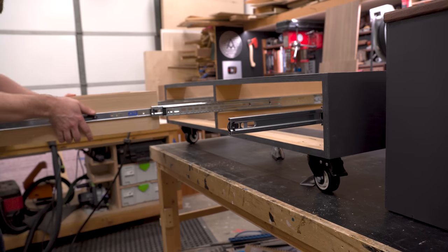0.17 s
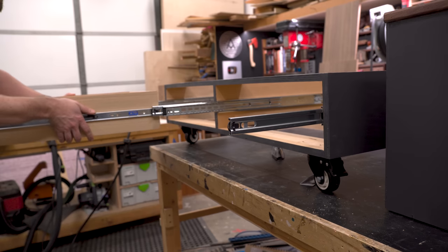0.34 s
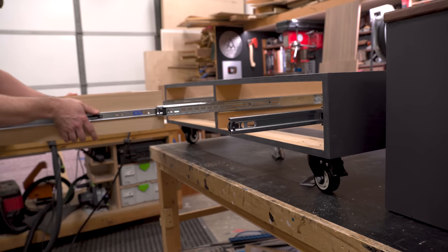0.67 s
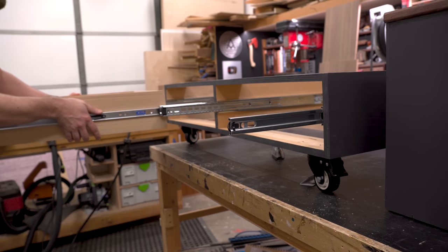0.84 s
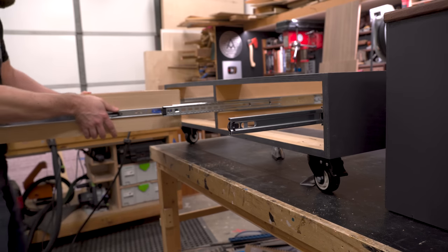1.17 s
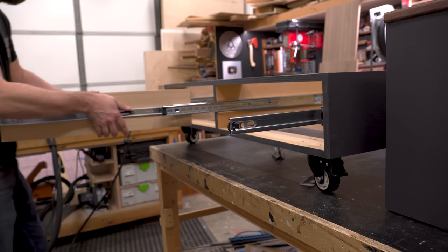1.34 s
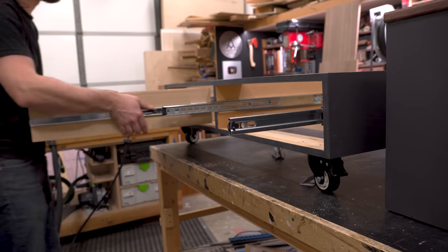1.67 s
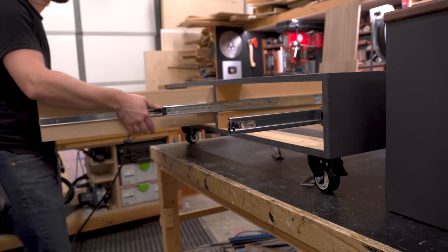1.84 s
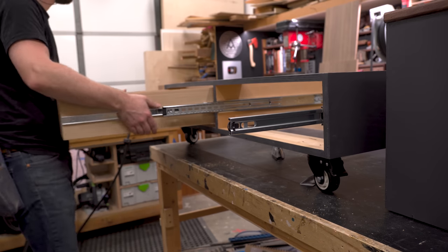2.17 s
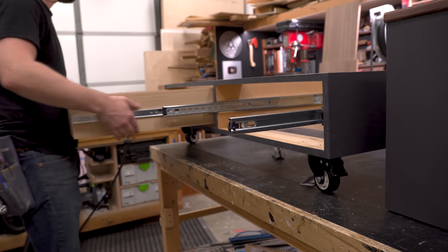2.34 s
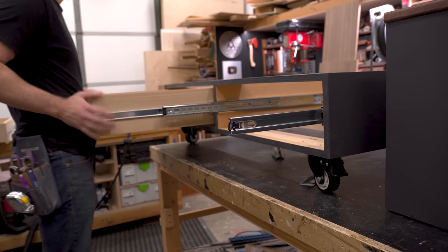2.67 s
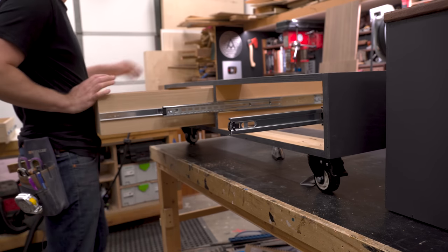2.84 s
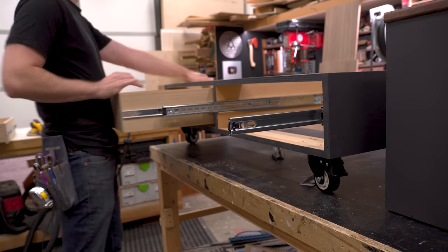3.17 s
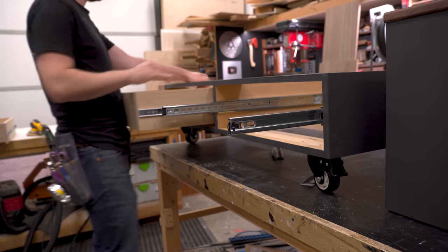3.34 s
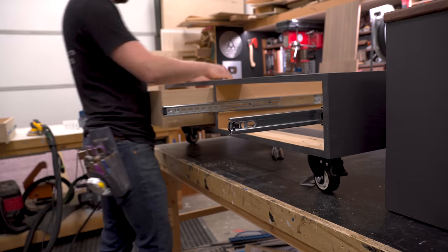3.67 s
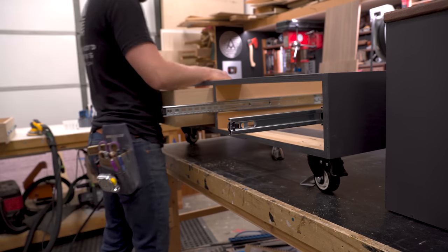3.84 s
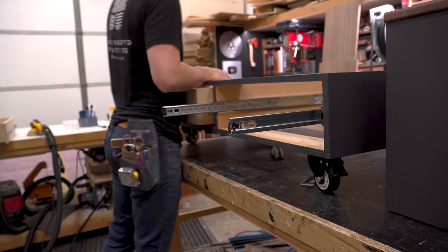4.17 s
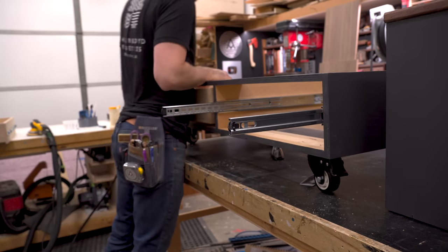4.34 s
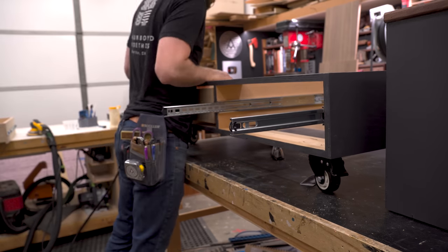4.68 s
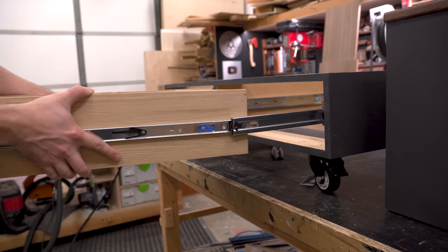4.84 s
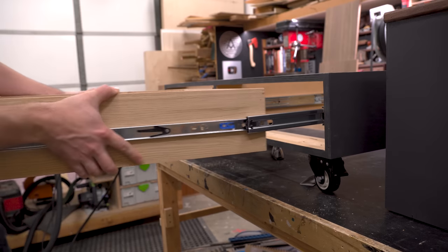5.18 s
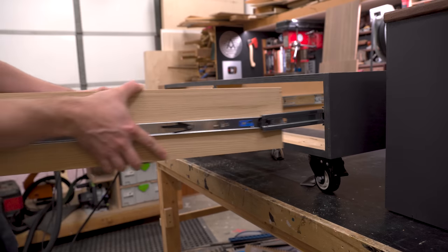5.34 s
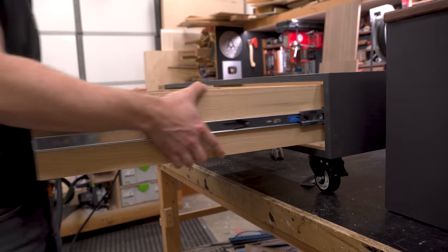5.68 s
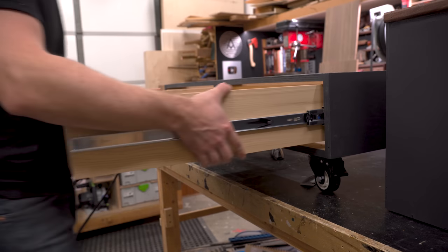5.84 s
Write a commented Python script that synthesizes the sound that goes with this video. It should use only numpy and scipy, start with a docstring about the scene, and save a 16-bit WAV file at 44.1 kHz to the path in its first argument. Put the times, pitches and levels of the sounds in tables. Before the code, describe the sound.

A wooden drawer is eased onto metal ball-bearing slides with light knocks, ticks and scrapes. A sharp steel clack comes midway, then the drawer rolls in with a low rumble, a brief rising hum and louder wooden bumps, ending in a ringing metal clack. After a short lull it rolls and knocks again. The sounds are clear, with a short workshop echo.

```python
"""A wooden drawer rolls on steel ball-bearing slides as it is fitted and pushed home in a workshop.
Rough tracks force the box into a rumble while the balls hiss, the rails rub and, on the long push,
a hum climbs. Impacts excite free vibration: the box knocks, the ball cage ticks, and twice a rail
strikes its stop and rings. The hard walls return the impacts and scuffs as diffuse reverberation,
over the faint steady noise of the air."""
import sys
import numpy as np
from scipy import signal
from scipy.fft import rfft, irfft
from scipy.io import wavfile

SR = 44100
rng = np.random.default_rng(int(sys.argv[2]) if len(sys.argv) > 2 else 0)


def dump_mix(stems):
    """Bounce the given channels to the path in sys.argv[1] as a 16-bit WAV at rate SR."""
    frames = np.atleast_2d(stems).T  # one column per channel
    limited = np.clip(frames, -1, 1)  # hard clip at full scale
    pcm = np.round(limited * 32767).astype(np.int16)
    wavfile.write(sys.argv[1], SR, pcm)


N = 265041

# Levels in the tables are relative.
# stretches of rolling, with abrupt level changes between them: t/s, rumble level/dB, hiss level/dB
ROLL_CURVES = [
    [(0.0, -39.5, -53.5), (0.156, -59.5, -66), (0.366, -55, -63), (0.494, -61.5, -74.5), (0.742, -102, -94)],
    [(1.008, -59, -91), (1.2, -53, -71)],
    [(1.21, -45, -60), (1.396, -46.5, -70), (1.646, -48, -73), (1.8, -52.5, -75)],
    [(1.81, -42.5, -64), (1.9, -45.5, -62.5), (2.04, -39, -59.5), (2.166, -47, -59.5),
     (2.314, -48.5, -53.5), (2.728, -48.5, -63.5), (2.87, -50, -70.5), (2.9, -65.5, -60.5)],
    [(3.03, -41, -65.5), (3.134, -43, -73), (3.232, -39, -63), (3.448, -38.5, -64.5), (3.6, -39, -70.5)],
    [(3.61, -36.5, -54.5), (3.662, -42.5, -50), (3.788, -47.5, -54.5), (4.0, -47, -61), (4.19, -45, -58.5),
     (4.44, -41, -57), (4.53, -47.5, -61), (4.81, -65.5, -80)],
    [(4.82, -49.5, -68), (4.932, -59, -78.5), (5.19, -58.5, -67), (5.42, -41.5, -64), (5.59, -41.5, -63.5),
     (5.714, -38, -70), (5.852, -40, -59), (6.01, -42.5, -50.5)],
]
# how tightly the rails bind, one value for each stretch: level added to the rub/dB
BINDING_DB = [-5.5, 3, 0, -2.5, 3.5, 5.5, 2]
# normal modes of the wooden box and of the steel rail: f/Hz, level/dB, T60/s
BOX_MODES = [(77, -28, 0.054), (144, -27, 0.014), (185.7, 2, 0.29), (258.3, 9, 0.1), (320, 1.5, 0.087),
             (388.6, 8, 0.068), (452.2, 9.5, 0.067), (495, 10.5, 0.083), (580, 8.5, 0.038),
             (713, 2.5, 0.073), (800.4, 4.5, 0.056), (960, -11, 0.11), (1214, -3.5, 0.032),
             (1500, -10, 0.018), (1665, -1.5, 0.013)]
RAIL_MODES = [(1083, 1, 0.023), (1957, 1.5, 0.039), (2450, -8, 0.02), (3620, -11, 0.032), (4660, 0, 0.027),
              (5950, -2, 0.012), (6320, -4, 0.04), (5900, -15, 0.049), (6720, 6.5, 0.0071),
              (6700, -3, 0.029), (8300, -6, 0.0071), (8900, -6.5, 0.022), (8800, -10, 0.015),
              (12400, -8, 0.0059), (12600, -7, 0.011), (14700, -28, .006)]
# blows on the box: t/s, level/dB, f favoured by the spot struck/Hz, crack over body/dB
BOX_BLOWS = [(0.009, -32.5, 247, -14), (0.123, -35, 255, -21), (0.1253, -31, 1410, -10),
             (0.191, -39, 470, -7), (0.242, -45, 466, -4), (0.279, -46, 580, -2.5), (0.336, -36, 470, -20),
             (0.472, -43.5, 447, -25), (0.692, -45, 584, -17), (1.222, -35.5, 830, -8),
             (1.255, -28, 1800, -27), (1.26, -31.5, 530, -8), (1.463, -30, 1020, -9.5),
             (1.648, -35.5, 765, -21), (1.704, -35.5, 560, -24), (1.812, -27.5, 540, -14.5),
             (1.83, -24, 396, -35), (1.855, -24, 413, -18.5), (1.936, -36, 530, -4), (1.982, -53, 530, -18),
             (2.034, -17.5, 387, -14.5), (2.161, -30.5, 453, -38), (2.318, -28, 480, -14.5),
             (3.403, -16.5, 580, -24), (3.487, -35, 534, -22), (3.6803, -14, 1500, -10),
             (3.684, -18.5, 530, -19), (3.686, -24.5, 200, -40), (3.7, -18.5, 254, -36),
             (3.878, -22.5, 440, -19), (4.328, -18, 537, -11), (4.34, -17.5, 480, -10),
             (4.351, -19.5, 416, -2), (4.36, -22.5, 266, -38), (4.487, -19, 328, -5),
             (4.488, -24, 184, -37), (4.502, -21, 760, -35), (4.513, -24.5, 510, -27),
             (4.851, -36, 930, -11), (4.953, -46, 327, 2.5), (5.472, -26, 440, -15),
             (5.517, -20.5, 1100, -10.5), (5.526, -14.5, 480, -46), (5.539, -20.5, 500, -47),
             (5.55, -27, 470, -19), (5.695, -29.5, 800, -14), (5.707, -23, 1230, -12),
             (5.72, -26.5, 327, -41), (5.775, -38.5, 304, 0), (5.838, -25.5, 480, -27),
             (5.875, -26, 510, -9)]
# rail against its stop: t/s, crash level/dB, clack f/Hz, clack level/dB, ring level/dB
STOP_IMPACTS = [(3.071, -19.5, 4300, -13, -59), (3.081, -33, 11600, -21, -41.5),
                (4.535, -24, 6470, -12, -27.5)]
# contacts of the ball cage: t/s, level/dB, offset for the lower rail sound/dB
CAGE_CONTACTS = [(0.0438, -51, 9), (0.0595, -49, -14), (1.2233, -46.5, 13.5), (1.263, -44, -5),
                 (1.288, -43.5, 9), (1.3233, -40, 6), (1.3463, -46.5, 8), (1.4866, -41, -31),
                 (1.809, -50, 5), (1.8392, -46, 4), (1.8566, -44, -17), (1.8848, -43, -10),
                 (1.91, -49, 13.5), (1.9394, -49.5, 14), (2.003, -49, 11), (2.02, -40.5, 3),
                 (2.197, -46, -14), (2.3131, -48, -3), (2.36, -47, 6), (3.3164, -52, -3), (3.713, -35, -9),
                 (3.7628, -55, -5), (3.778, -51, -8), (3.815, -40, -33.5), (3.8454, -43, 7),
                 (3.916, -45.5, 12), (3.9484, -50, -10), (3.978, -55, -3), (4.4099, -50, -10),
                 (4.4385, -37.5, -17), (4.467, -46, -3), (4.5177, -26, -6), (4.891, -54.5, 9),
                 (5.5159, -43, 7), (5.5513, -37, -13), (5.5977, -32.5, 2), (5.841, -44, -13),
                 (5.873, -45, -1)]
# resonances of a cage tick: f/Hz, nominal width/Hz, level/dB
CAGE_MODES = [(8600, 450, 16.5), (9600, 270, -6), (12500, 3400, 20), (13300, 560, -18)]
# rail scuffing along rail: t/s, level/dB, decay time/s, tilt towards the treble/dB
RAIL_SCUFFS = [(0.128, -47, 0.037, 7), (1.226, -50, 0.076, 2), (1.464, -47, 0.031, 6.5),
               (2.044, -55, 0.12, 12), (2.757, -60.5, 0.019, 16), (2.867, -59.5, 0.015, 11.5),
               (2.906, -56.5, 0.016, -1), (3.036, -43, 0.085, -0.5), (3.678, -34.5, 0.012, 5.5),
               (4.342, -46, 0.016, 9), (5.035, -63.5, 0.023, 12), (5.595, -48.5, 0.0031, 1),
               (5.779, -47, 0.016, -5), (5.918, -43, 0.035, 2.5)]
# spectral densities of the noises: f/Hz, level/dB
RUB_SPECTRUM = [(530, -5), (900, 2.5), (1390, -4), (1620, -5.5), (1750, -7.5), (2460, -11), (5500, -26),
                (7150, -19), (12100, -120)]   # rail on rail
HISS_SPECTRUM = [(2350, -8), (4000, -5.5), (5470, -4), (6300, -8.5), (7650, -8.5), (8510, -5),
                 (10600, -16.5), (13900, -13.5), (15900, -24), (16400, -25)]   # balls in the rails
CRACK_SPECTRUM = [(700, -1), (1400, 1.5), (2200, -3), (3300, -8.5), (5000, -14.5), (8000, -23.5),
                  (16400, -52)]   # sharp edge of a blow on wood
CRASH_SPECTRUM = [(120, -18), (300, -10), (600, -1), (1000, -0.5), (2000, -6.5), (4000, -9), (6000, -5),
                  (9000, -6), (12500, -18.5), (15500, -15.5), (16500, -28)]   # steel striking steel
RATTLE_SPECTRUM = [(1000, -2), (2500, 5), (3500, 3), (6000, -3), (8000, -12)]   # lower sound of the rail
AIR_SPECTRUM = [(12, -111), (20, -5.5), (81, -1), (124, -9), (360, -11.5), (519, -13), (614, -15),
                (1080, -17.5), (2570, -26.5), (15000, -31.5), (16400, -60)]   # air of the room
# reverberation time of the workshop: f/Hz, T60/s
REVERB_TIMES = [(150, 0.3), (1000, 0.2), (4000, 0.44), (9000, 0.44), (15000, 0.34)]


def rolling():
    """Forced vibration: balls on rough tracks drive the box modes; the rails rub and hiss."""
    t = np.arange(N) / SR
    times, *levels = np.transpose(np.concatenate(ROLL_CURVES))
    rumble_db, hiss_db = [np.interp(t, times, level) for level in levels]
    binding_db = np.interp(t, times, np.repeat(BINDING_DB, [len(curve) for curve in ROLL_CURVES]))
    rub_db = binding_db + 0.51 * rumble_db + 0.49 * hiss_db
    load = drift(14)   # the hand's pressure wavers
    tracks = [grains(900, 3.83) * from_db(2.73 * load + 2.5 * drift(7.7)) for _ in range(4)]
    # the screws and wood pass little treble
    tracks = signal.sosfilt(signal.butter(2, 680, fs=SR, output="sos"), tracks)
    wood = sum(from_db(db) * rms_one(ring(tracks[k % 4], hz, t60))
               for k, (hz, db, t60) in enumerate(BOX_MODES))
    rub = from_db(rub_db + 2.5 * load) * colour(grains(6000, 2.34), RUB_SPECTRUM)
    balls = grains(per_s=9000, spread_db=2.1)
    grit = from_db(-15) * grains(per_s=60, spread_db=2.2)
    hiss = from_db(hiss_db + 0.37 * load) * colour(balls + grit, HISS_SPECTRUM)
    return from_db(rumble_db) * rms_one(wood) + rub + hiss


def rolling_hum(start_s=3.1, end_s=3.62, start_hz=309.5, end_hz=613):
    """Frequency modulation: a wavering tone climbs with the rolling speed on the long push."""
    progress = np.clip((np.arange(N) / SR - start_s) / (end_s - start_s), 0, 1)
    hz = (start_hz + (end_hz - start_hz) * progress) * (1 + 0.0497 * drift(38))
    swell = from_db(-43 + 4.1 * drift(30.08)) * np.sqrt(np.abs(np.sin(np.pi * progress)))
    return swell * np.sin(2 * np.pi * np.cumsum(hz) / SR)


def box_knocks(rise_cycles=0.63):
    """Modal superposition: a blow starts the box modes together; its sharp edge is heard as a crack."""
    hz, db, t60 = np.transpose(BOX_MODES)
    body, t = np.zeros(N), np.arange(SR // 5)[:, None] / SR
    phases = rng.uniform(0, 2 * np.pi, (len(BOX_BLOWS), len(BOX_MODES)))
    for (start_s, level_db, favoured_hz, _), phase in zip(BOX_BLOWS, phases):
        # held in the hands the box rings shorter than when free, and shorter still when struck hard
        held_t60 = t60 * max(0.66 - 0.0054 * (level_db + 19.5), .1)
        octaves_off = np.log2(hz / favoured_hz)
        share = from_db(db / 2) * np.exp(-.5 * (octaves_off / 0.3) ** 2)
        modes = share * from_db(-60 * t / held_t60) * np.sin(2 * np.pi * hz * t + phase)
        rise = 1 - np.exp(-t[:, 0] * favoured_hz / rise_cycles)
        blow = modes.sum(axis=1) * rise / np.sqrt(np.sum(share ** 2))
        i = round(start_s * SR)
        body[i:i + len(t)] += from_db(level_db) * blow[:N - i]
    times, level_db, _, crack_db = np.transpose(BOX_BLOWS)
    edges = rng.standard_normal(N) * bursts(times, level_db + crack_db, decay_s=.006)
    return body, colour(edges, CRACK_SPECTRUM)


def rail_stops(chatter_s=0.051):
    """Impact excitation: steel on steel crashes and clacks, then the loose rail chatters and rings."""
    times, crash_db, clack_hz, clack_db, ring_db = np.transpose(STOP_IMPACTS)
    hit = colour(rng.standard_normal(N) * bursts(times, crash_db, decay_s=.0015), CRASH_SPECTRUM)
    for i, hz, db in zip(np.round(times * SR), clack_hz, clack_db):
        hit += ring(from_db(db) * (np.arange(N) == i), hz, t60=0.003)
    chatter = bursts(times, ring_db, chatter_s) / np.sqrt(chatter_s * SR) * grains(4000, 4.8)
    modes = sum(from_db(db) * ring(chatter, hz, t60) for hz, db, t60 in RAIL_MODES)
    clatter = from_db(24.5) * colour(chatter, CRASH_SPECTRUM)
    return hit, modes + clatter


def cage_ticks():
    """Damped resonance: tiny steel contacts excite short high modes and the rail's lower rattle."""
    times, level_db, rail_db = np.transpose(CAGE_CONTACTS)
    high = rng.standard_normal(N) * bursts(times, level_db - 26, decay_s=.0012)
    low = rng.standard_normal(N) * bursts(times, level_db + rail_db - 7, decay_s=.0024)
    modes = sum(from_db(db) * ring(high, hz, t60=1.35 / width) for hz, width, db in CAGE_MODES)
    return modes + colour(low, RATTLE_SPECTRUM)


def rail_scuffs():
    """Sliding friction: brief rubs of steel on steel, each with a dull and a bright part."""
    times, db, decay_s, tilt_db = np.transpose(RAIL_SCUFFS)
    dull = grains(5000, 1.5) * bursts(times, db - tilt_db, decay_s)
    bright = grains(8000, 3.6) * bursts(times, db + tilt_db - 9, decay_s)
    return colour(dull, RATTLE_SPECTRUM) + colour(bright, HISS_SPECTRUM)


def reverberation(parts, build_s=0.0011):
    """Diffuse field: the echoes build up, then each band decays at its own rate."""
    t, edges = np.arange(SR) / SR, np.geomspace(60, 17000, 13)
    tail = np.zeros(SR)
    for low, high in zip(edges, edges[1:]):
        band = signal.butter(2, [low, high], "band", fs=SR, output="sos")
        t60 = at_hz(REVERB_TIMES, np.sqrt(low * high))
        tail += signal.sosfilt(band, rng.standard_normal(SR)) * from_db(-60 * t / t60)
    tail *= 1 - np.exp(-t / build_s)
    return signal.fftconvolve(parts, tail[None] / np.sqrt(np.sum(tail ** 2)), axes=1)[:, :N]


def room_air():
    """Stationary noise: the faint air of the room, strongest in the bass."""
    return from_db(-66.5) * colour(rng.standard_normal(N), AIR_SPECTRUM)


def ring(force, hz, t60):
    """Damped oscillator: a unit impulse starts a decaying sine of height 1."""
    r, w = from_db(-60 / (t60 * SR)), 2 * np.pi * hz / SR
    return signal.lfilter([0, np.sin(w)], [1, -2 * r * np.cos(w), r * r], force + 1e-18)


def grains(per_s, spread_db):
    """Shot noise: random contacts of uneven size and sign, at rms 1."""
    sizes = from_db(spread_db * np.minimum(rng.exponential(1, N), 4)) * rng.choice([-1, 1], N)
    return rms_one(sizes * (rng.random(N) < per_s / SR))


def bursts(times, levels_db, decay_s):
    """Exponential decay: the envelope of contacts that start at once and die away."""
    envelope = np.zeros(N)
    for start_s, db, tau in np.broadcast(times, levels_db, decay_s):
        i, t = round(start_s * SR), np.arange(int(6 * tau * SR) + 2) / SR
        envelope[i:i + len(t)] += (from_db(db) * np.exp(-t / tau))[:N - i]
    return envelope


def drift(per_s):
    """Slow fluctuation: straight lines join random values of unit variance."""
    steps = rng.standard_normal(round(N / SR * 40))
    return np.interp(np.arange(N) / SR * per_s, np.arange(len(steps)), steps)


def colour(x, spectrum):
    """Minimum-phase filtering with the given spectrum and unit power gain."""
    hz = np.maximum(np.arange(2049) * SR / 4096, 10)
    cepstrum = irfft(np.log(from_db(at_hz(spectrum, hz))))
    cepstrum[1:2048] *= 2
    cepstrum[2049:] = 0
    response = irfft(np.exp(rfft(cepstrum)))
    return signal.oaconvolve(x, response / np.sqrt(np.sum(response ** 2)))[:N]


def at_hz(points, hz):
    """Interpolation of a table (f/Hz, value) on a logarithmic frequency axis."""
    table_hz, values = np.transpose(points)
    return np.interp(np.log(hz), np.log(table_hz), values)


def from_db(db):
    """Amplitude ratio for a level in decibels."""
    return 10 ** (np.asarray(db) / 20)


def rms_one(x):
    """Normalisation to rms 1."""
    return x / np.sqrt(np.mean(x ** 2) + 1e-20)


def scene(break_s=4.825):
    """Superposition of the direct sound, its reverberation and the air of the room."""
    body, crack = box_knocks()
    hit, ringing = rail_stops()
    tick, scuff = cage_ticks(), rail_scuffs()
    t = np.arange(N) / SR
    to_room = (from_db(-4) * body + from_db(-3.5) * (crack + scuff) + from_db(-9) * tick
               + from_db(3.5) * hit + from_db(4) * ringing)
    echoes_before, echoes_after = reverberation(to_room * np.array([t < break_s, t >= break_s]))
    fade = np.clip((break_s - t) / 0.0078, 0, 1)   # the ringing and the echoes so far break off
    drawer = rolling() + rolling_hum() + body + crack + tick + scuff + from_db(5) * hit
    drawer += fade * (ringing + echoes_before) + echoes_after
    # a high-pass filter thins the deep bass of the drawer's sound
    drawer = signal.sosfilt(signal.butter(3, 100.5, "high", fs=SR, output="sos"), drawer)
    return (drawer + room_air())[None]


def record(dry, ceiling=.4, cutoff_hz=16600):
    """Soft saturation rounds the peaks; a low-pass filter removes the highest treble."""
    rounded = ceiling * np.tanh(dry / ceiling)
    return signal.sosfilt(signal.cheby2(16, 70, cutoff_hz, fs=SR, output="sos"), rounded)


dry = scene()
out = record(dry)
dump_mix(out)
```